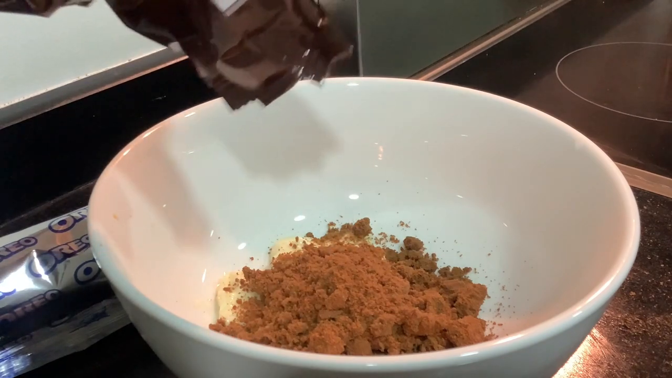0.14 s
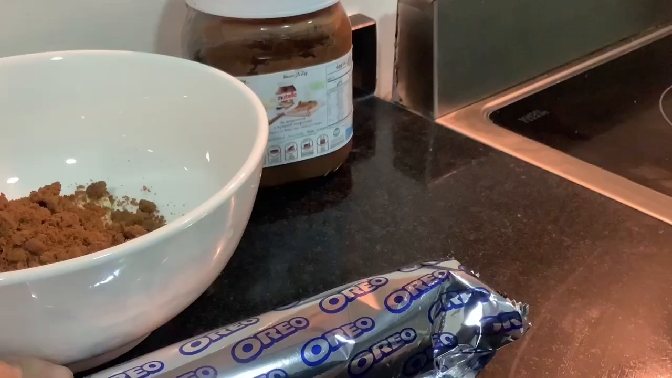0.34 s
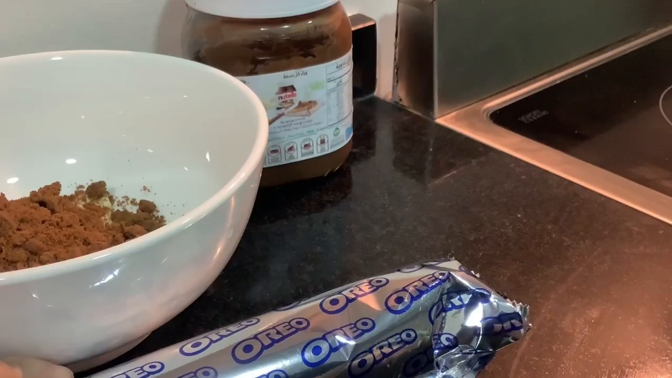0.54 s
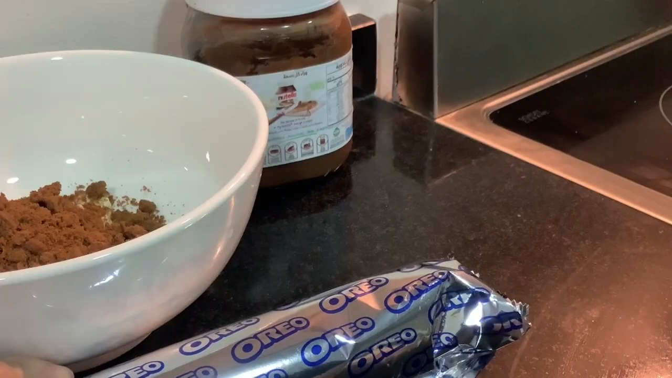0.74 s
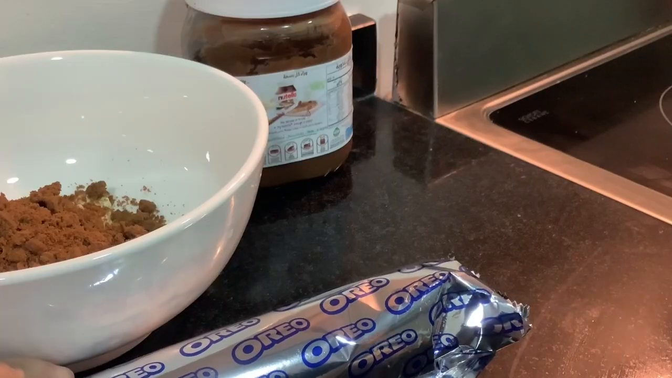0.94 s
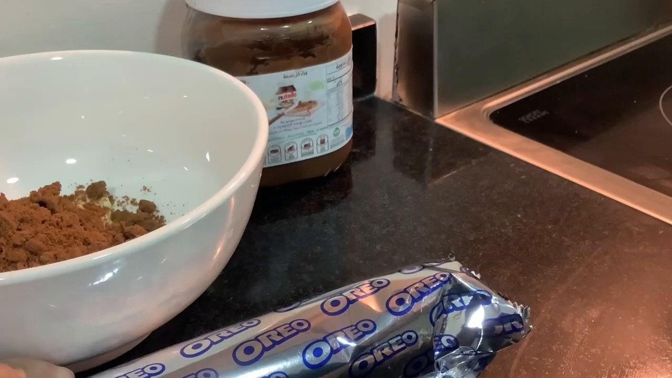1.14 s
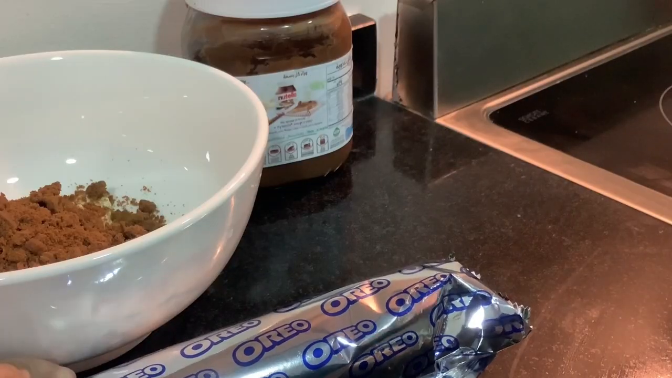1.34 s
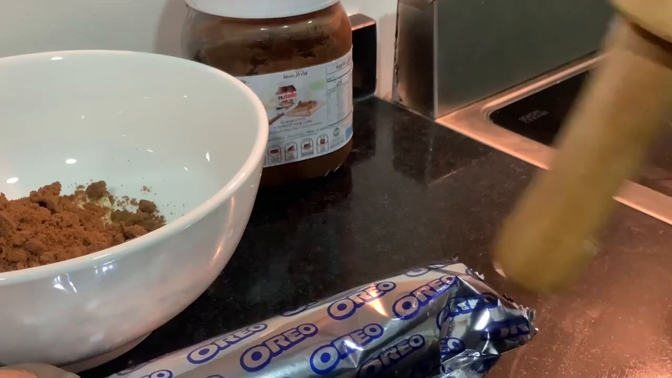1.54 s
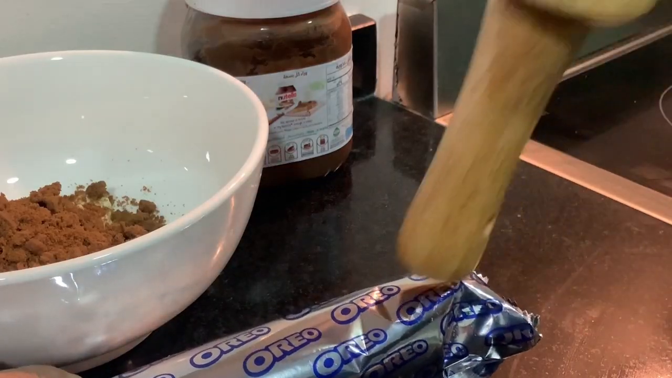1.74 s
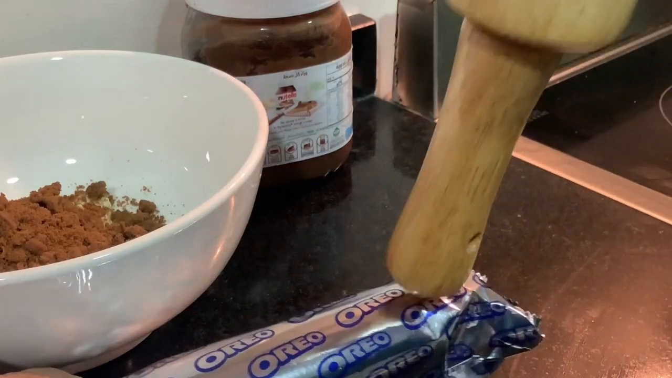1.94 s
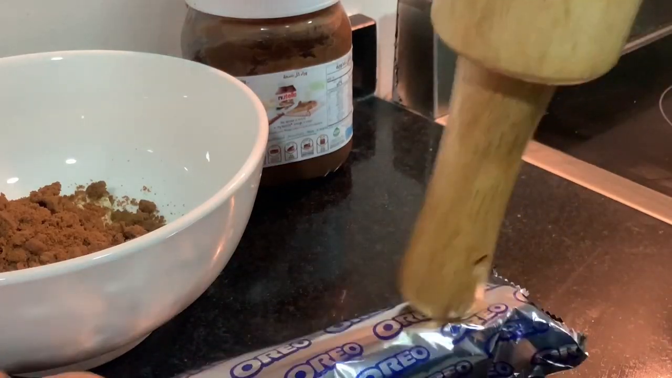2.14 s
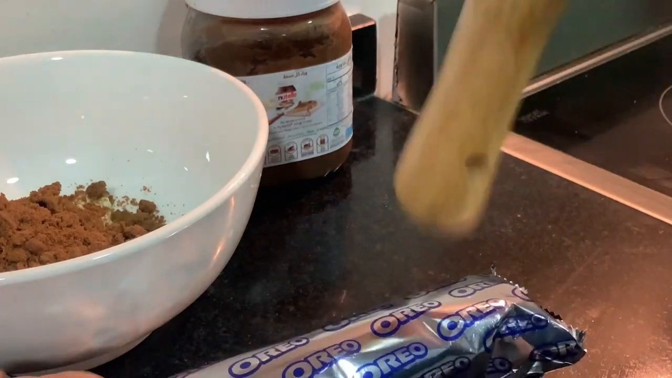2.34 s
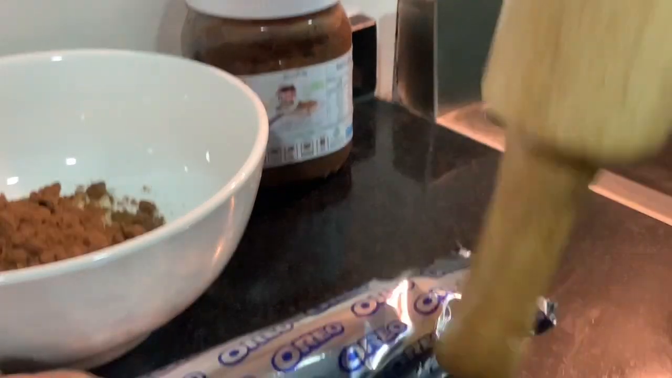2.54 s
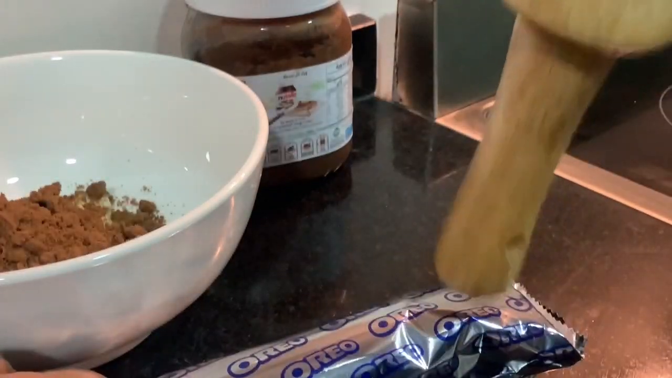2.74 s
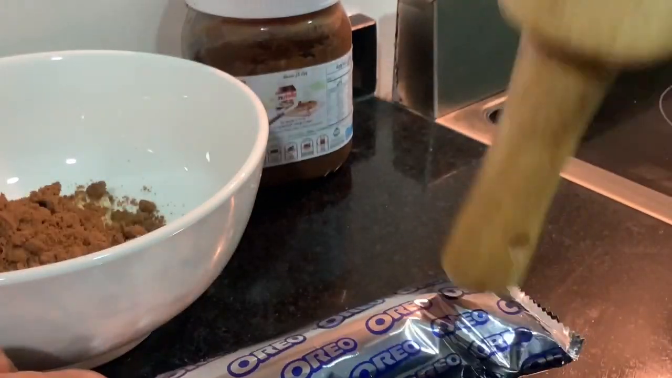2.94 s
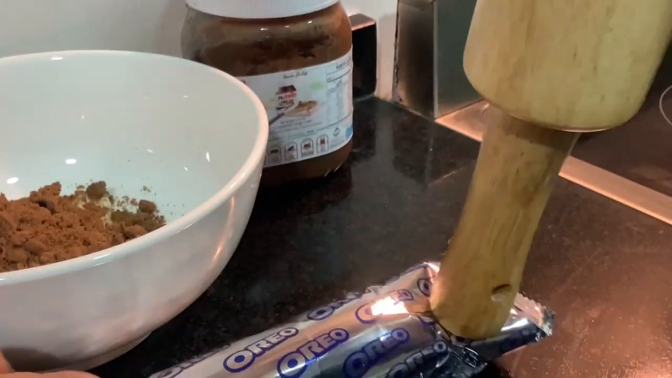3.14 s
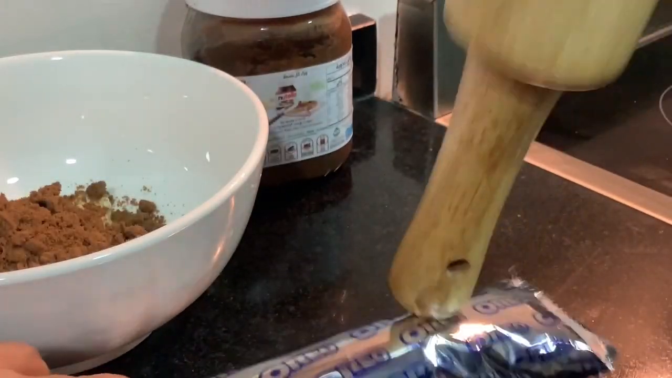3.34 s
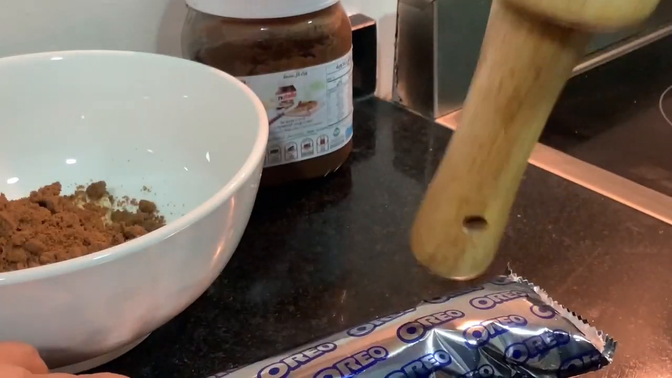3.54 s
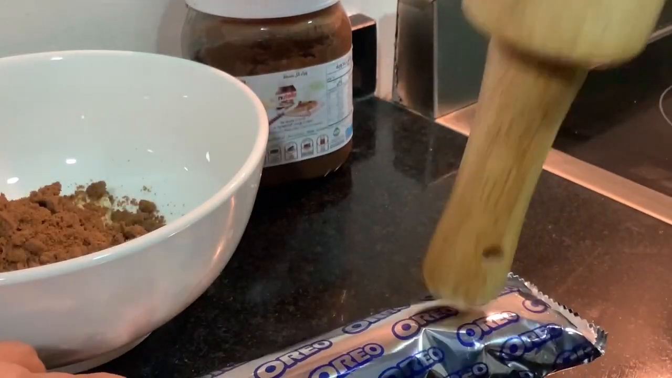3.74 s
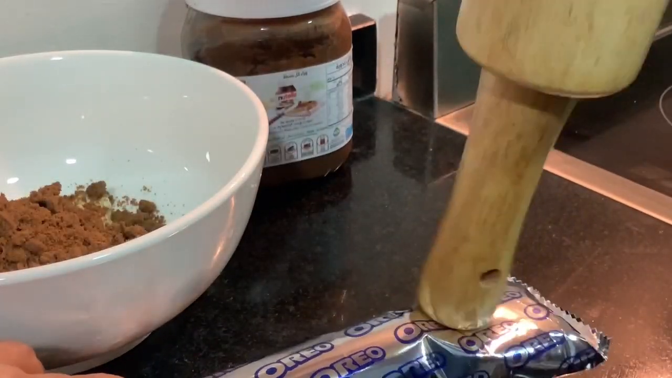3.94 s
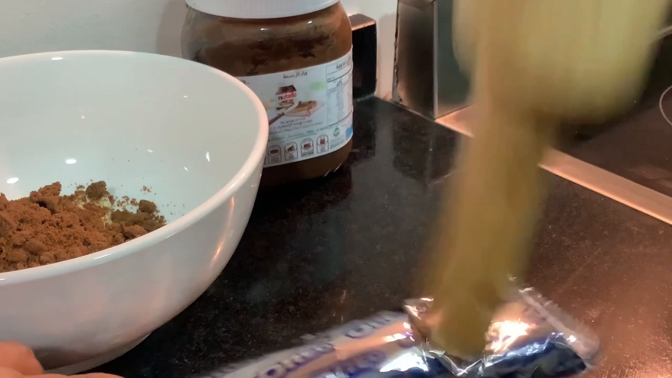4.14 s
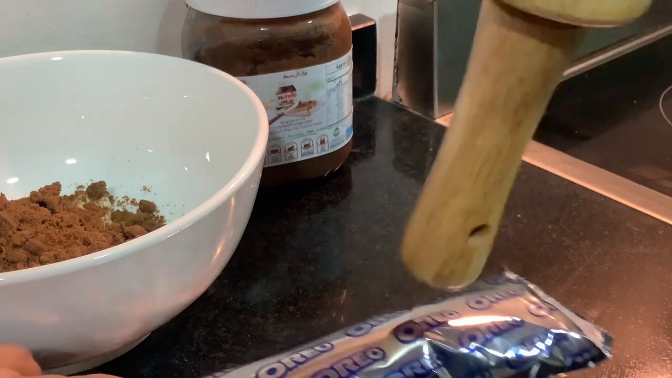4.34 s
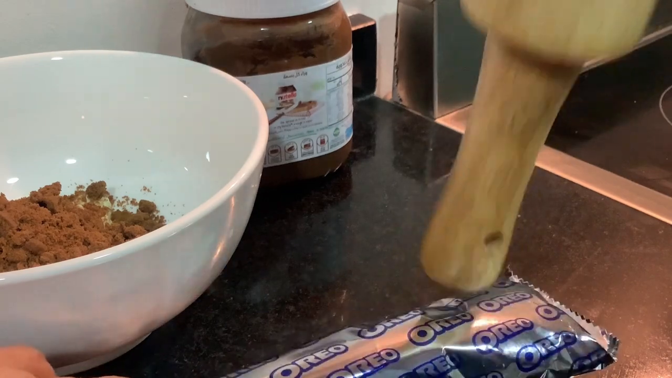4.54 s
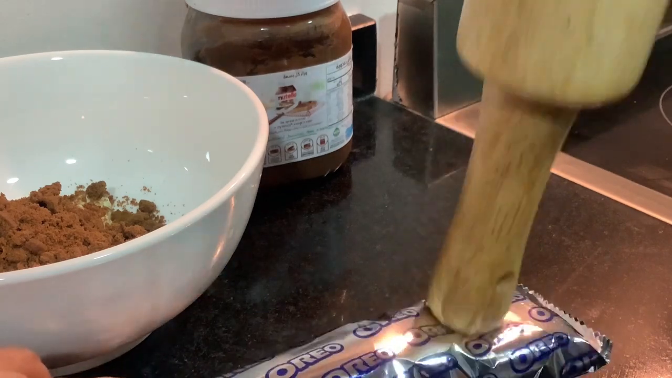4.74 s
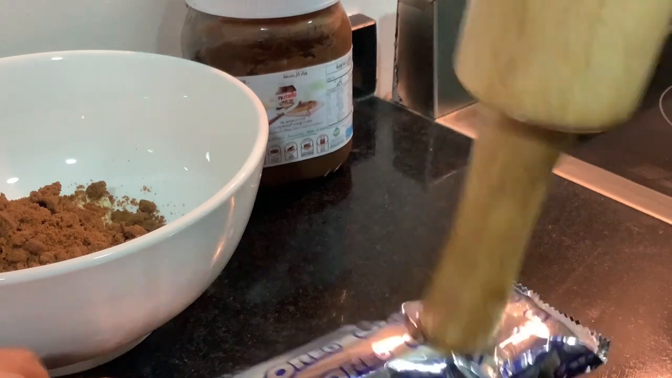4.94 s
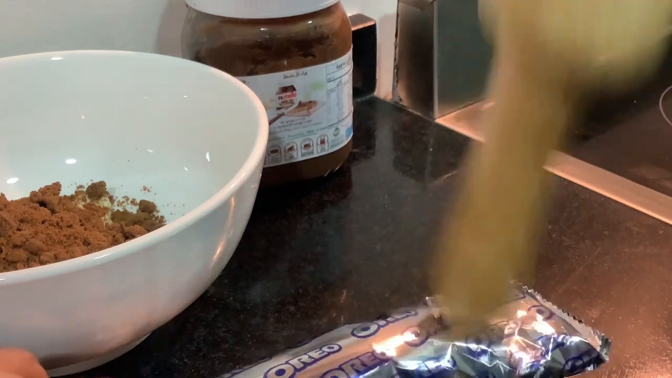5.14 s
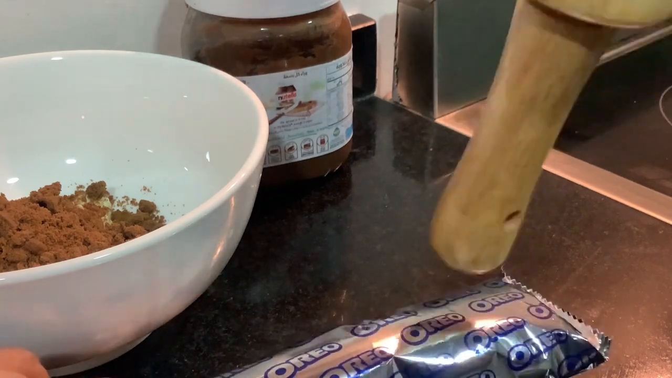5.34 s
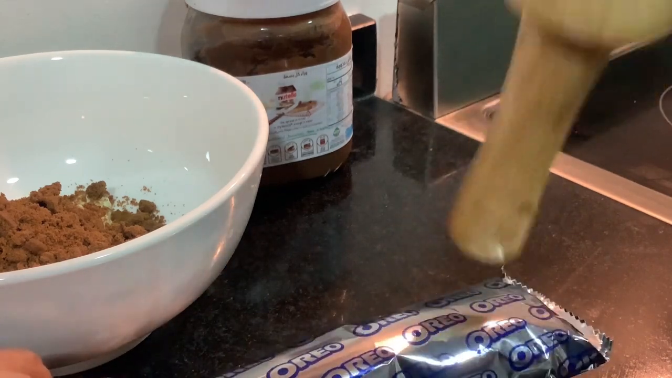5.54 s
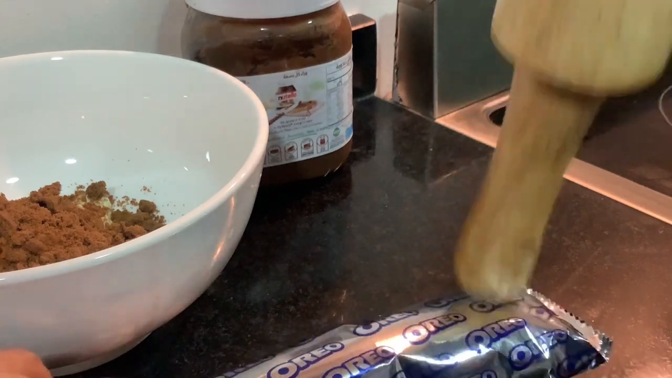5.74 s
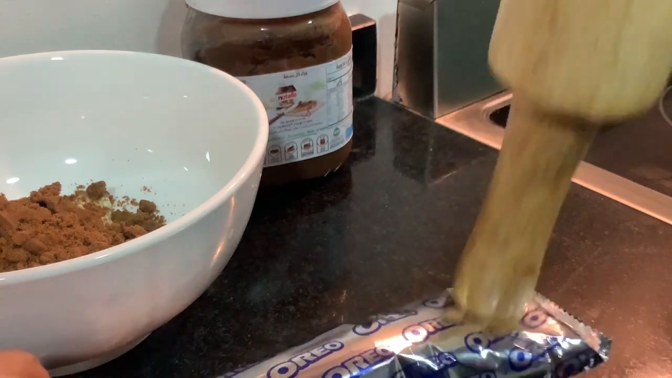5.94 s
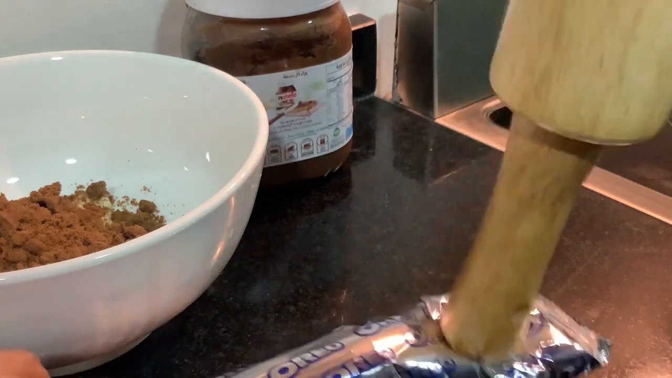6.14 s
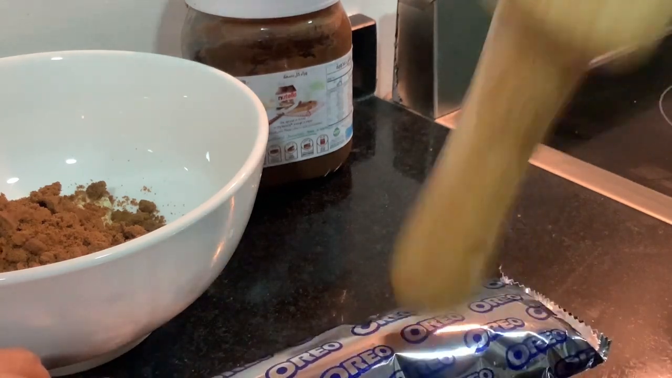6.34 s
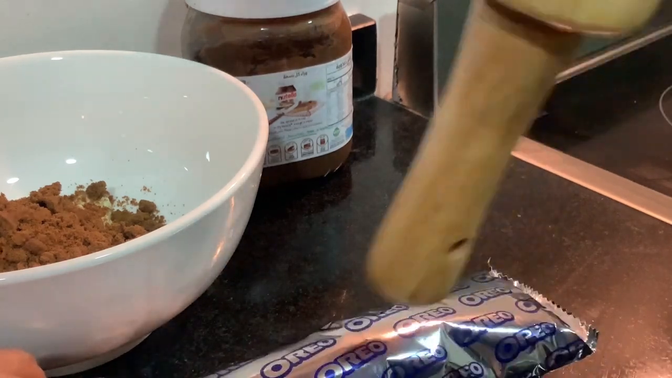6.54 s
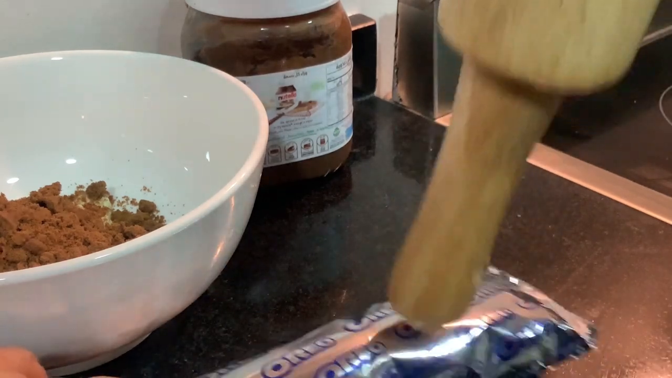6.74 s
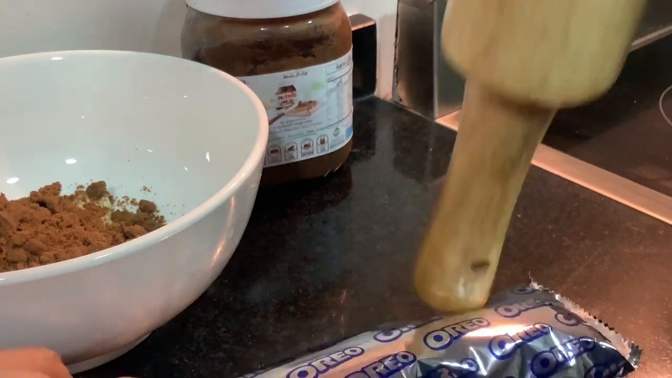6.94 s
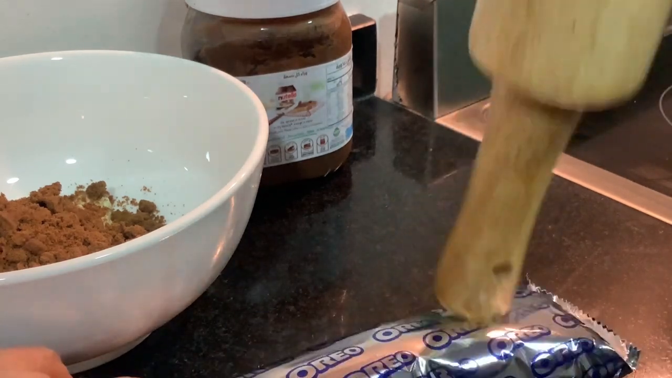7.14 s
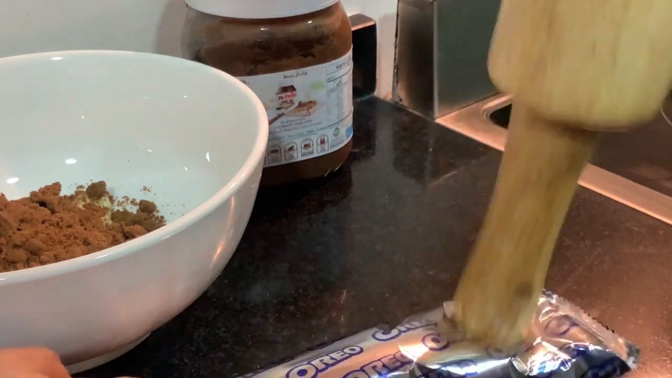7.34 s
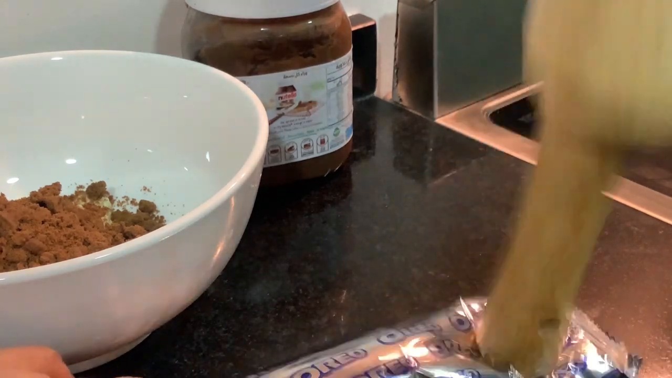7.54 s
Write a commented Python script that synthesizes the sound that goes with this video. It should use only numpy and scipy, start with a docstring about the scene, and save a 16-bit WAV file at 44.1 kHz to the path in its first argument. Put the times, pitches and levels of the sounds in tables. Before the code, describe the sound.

A wooden rolling pin pounds foil-wrapped biscuits on a stone worktop in fast even blows, each a gritty crunch with crinkling foil and a low thud.

```python
"""In a kitchen, the handle of a wooden rolling pin pounds biscuits in their foil wrapper on a stone worktop.
Each blow, close to the microphone, is a burst of tiny breaks, with damped tones for the clack of the pin,
the knock of the worktop and the thud of the cupboard below. The wrapper crinkles in clumps of crackle and snaps
in short bursts of noise. Outside, a songbird whistles in gliding tones; shaped noise gives a low kitchen rumble.
Kitchen and street each add an echo."""
import sys
import numpy as np
from scipy import signal
from scipy.fft import rfft, irfft, next_fast_len
from scipy.io import wavfile
from scipy.ndimage import map_coordinates

SR = 44100
rng = np.random.default_rng(int(sys.argv[2]) if len(sys.argv) > 2 else 0)


def generate_wav(signal):
    """Clip the signal to [-1, 1] and save it as 16-bit WAV at the path in sys.argv[1]."""
    frames = np.transpose(np.atleast_2d(signal))
    scaled = np.clip(frames, -1, 1) * 32767
    pcm = np.round(scaled).astype(np.int16)
    wavfile.write(sys.argv[1], SR, pcm)


def gain_from_db(level_db):
    """Turn a decibel level (scalar or array-like) into a linear amplitude factor."""
    decades = np.asarray(level_db, float) / 20
    return 10 ** decades


N = 334264  # length in samples

# Levels in these tables are relative: most sources also have a fixed trim of their own.
# Kitchen rumble over time. Each row: time in seconds, level in dB.
RUMBLE_LEVEL = [(0.0, -46), (0.67, -48.5), (0.93, -47), (1.58, -48), (2.68, -50), (2.81, -47),
                (4.28, -47.5), (4.98, -48.5), (5.95, -45), (7.22, -50), (7.58, -48)]
# Tone of the rumble. Each row: frequency in Hz, level in dB.
RUMBLE_TONE = [(15, -89), (25, -24), (68, -0.5), (114, 1.5), (277, -10.5), (344, -17.5), (545, -14),
               (734, -23.5), (2550, -37.5), (4140, -44), (5570, -45), (7500, -46.5), (16000, -49)]
# Whistles of the bird. Each row: start in seconds, length in seconds, first pitch in Hz,
# pitch it glides towards in Hz, peak level in dB.
WHISTLES = [(.03, .03, 1700, 1730, -63), (0.241, .2, 5640, 4820, -59.5), (0.442, .12, 5940, 6400, -64),
            (5.001, 0.074, 2490, 2450, -42.5), (5.3, 0.072, 2430, 2500, -62),
            (6.041, 0.095, 2020, 1824, -44), (6.258, 0.036, 2470, 2440, -44),
            (6.339, 0.083, 2640, 2530, -46.5), (6.565, 0.085, 2130, 2080, -48),
            (6.76, .07, 2500, 2480, -49), (7.27, 0.03, 1670, 1620, -49)]
# Chirps that climb and break off downwards. Each row: start in seconds, length in seconds, level in dB.
CHIRPS = [(0.616, 0.024, -57.5), (0.695, 0.026, -56), (0.737, 0.017, -59), (.792, .018, -55.5),
          (0.832, .014, -58)]
# Shape of every chirp. Each row: share of its length from 0 to 1, pitch in Hz, level in dB.
CHIRP_SHAPE = [(0, 3450, -5), (.45, 3970, -10), (.8, 4130, -2), (1, 3300, -1)]
# The bird's opening phrase. Each row: time in seconds, pitch in Hz, level in dB.
PHRASE = [(.075, 1940, -59), (.1, 2300, -58), (.125, 2604, -48), (.14, 2520, -51), (.148, 2830, -48),
          (.156, 2760, -56), (.165, 2000, -57), (.172, 1900, -70)]
# Strength of the bird's octave. Each row: pitch of the note in Hz, octave against the note in dB.
OCTAVE = [(4200, -40), (4900, -15), (5500, -19), (6000, -40)]
# Echo of the street around the bird. Each row: frequency in Hz, time to die by 60 dB in seconds.
STREET = [(2000, 0.68), (6000, 0.35)]
# Echo of the kitchen. Each row: frequency in Hz, time to die by 60 dB in seconds.
KITCHEN = [(100, 0.58), (500, 0.48), (2500, 0.54), (8000, 0.47), (15000, 0.13)]
# Single creases of the foil snapping. Each row: time in seconds, level in dB, pitch in Hz,
# low tick against the click in dB.
SNAPS = [(0.036, -36, 12500, -30), (0.0627, -33, 7800, -5), (0.097, -32.5, 5400, -21),
         (0.1794, -42, 5560, -15), (0.218, -50, 8000, -20), (0.2444, -49, 8000, -15),
         (0.3444, -51, 4940, -7), (0.7468, -54, 3900, 18), (0.829, -42, 11500, -30), (1.052, -48, 3570, 13),
         (1.0837, -42, 4380, -12), (1.1937, -20, 6360, -3), (1.2479, -50, 3860, 16.5),
         (1.3393, -30.5, 4170, 6.5), (1.356, -30, 4500, -6), (1.4039, -31, 3200, 1),
         (1.409, -18, 9150, -28), (1.4506, -24, 8300, -20), (1.4632, -21, 9350, -29),
         (1.5084, -32, 9990, -15), (1.569, -34, 10300, -3.5), (1.578, -33, 10000, -27),
         (1.658, -43, 3420, -3), (1.6796, -50, 3800, -9), (1.73, -38, 7260, -21), (1.7497, -39, 11200, -8),
         (1.8185, -8, 5490, -1), (1.924, -11, 11300, -8), (1.9644, -29, 10200, -20),
         (2.003, -21.5, 10700, -31), (2.2033, -22, 3730, 3), (2.367, -34.5, 4670, 2),
         (2.4518, 5, 7400, -11), (2.466, -9, 4200, 10), (2.537, -27, 3210, 6), (2.5604, -10, 10100, -18),
         (2.5657, -8, 5570, -8), (2.614, -14.5, 5900, -15), (2.653, -22, 3220, 2), (2.672, -25, 3200, 1),
         (2.8091, -4, 3780, -0.5), (2.834, -16, 11150, -16), (2.9043, -15, 3160, 2),
         (2.9503, -15.5, 4650, -2), (3.0972, -6, 4050, -1), (3.2333, -17.5, 5360, 5.5),
         (3.265, -16, 3330, -9), (3.2785, -13.5, 8540, -9), (3.3982, -33, 6990, -9),
         (3.4497, -15.5, 4540, -6), (3.481, -22.5, 4700, 1.5), (3.5564, -36, 9040, -11),
         (3.5873, -38.5, 3400, 12.5), (3.6064, -46, 3490, 10), (3.73, -17, 5280, -13),
         (3.7494, -20.5, 4150, 3), (3.77, -18, 3800, 1), (3.843, -19, 10300, -3.5),
         (3.8683, -17.5, 5800, -13), (3.978, -17, 5920, -14), (4.2552, -14, 4510, 1.5),
         (4.3125, -21.5, 3620, -1), (4.359, -25.5, 5350, 0), (4.5113, -24.5, 4830, 7.5),
         (4.526, -23, 6000, -8), (4.546, -26.5, 5000, 6.5), (4.778, -16.5, 4700, -0.5),
         (4.834, -6.5, 11300, -38), (4.898, -20, 3520, -17), (4.9594, -1.5, 9700, -13),
         (4.9773, -9, 5760, -5), (5.0116, -36, 3450, -4), (5.22, -12.5, 3530, -12), (5.2416, -25, 4290, 1),
         (5.264, -13, 5380, -3.5), (5.476, -10.5, 4060, -7), (5.4946, -11, 5400, -13),
         (5.5104, -34, 3710, 4), (5.6933, -9, 5530, -24), (5.7093, -24, 4330, 1), (5.726, -4, 7640, -11),
         (5.7379, -10.5, 5400, -3), (5.7595, -12.5, 4000, -2), (5.8473, -44.5, 3300, 13),
         (5.954, -11, 5870, -15), (5.9852, -11, 5400, -0.5), (6.101, -46.5, 3230, 11),
         (6.1936, -9.5, 5510, -2.5), (6.2344, -13.5, 5870, 2), (6.2444, -19, 3430, 8),
         (6.2948, -33, 3500, 7), (6.4444, -9, 5460, -1.5), (6.4762, -16, 3220, 1),
         (6.5148, -20.5, 3610, -2), (6.584, -22, 5900, -23), (6.6448, -7.5, 5300, 0),
         (6.7254, -16, 4720, 2.5), (6.839, -21, 3780, -14), (6.959, -27, 4760, -7), (6.9709, -14, 3530, -5),
         (7.025, -29, 4720, -1), (7.1076, -11.5, 5300, 6.5), (7.1521, -14.5, 5200, -4),
         (7.1647, -20, 5600, 8.5), (7.3843, -8.5, 3300, -1.5)]
# The pin leans on the packet after a blow, then lifts. Each row: start in seconds, foil level in dB,
# sag in dB per second, time held in seconds, crumbs against the foil in dB.
PRESSES = [(1.818, -22.5, 200, 0.028, -2.5), (2.104, -22, 161, 0.13, 3), (2.412, -13, -24, .047, -5),
           (2.468, -21.5, 34, 0.0553, 6), (2.797, -15.5, 114, .12, -6), (3.09, -15.5, 228, 0.22, 2),
           (3.358, -22, 334, .095, 6.5), (3.645, -18.5, 198, 0.3, 1.5), (3.906, -19.5, 161, 0.1, 2.5),
           (4.16, -16.5, 143, 0.15, -1), (4.412, -23, 137, 0.13, 3), (4.684, -16.5, 205, 0.16, 4.5),
           (4.935, -21, 124, 0.077, -3), (5.18, -27.5, 30, 0.092, 0), (5.426, -27, 21, 0.085, 1),
           (5.668, -22.5, 45, 0.091, -8), (5.905, -23.5, 17, 0.096, -4.5), (6.148, -26, 3, 0.088, -5),
           (6.386, -18, 101, 0.106, -5), (6.622, -16.5, 231, 0.13, 2), (6.856, -19.5, 174, .12, 5),
           (7.093, -25, 52, 0.093, -0.5), (7.33, -26, 35, 0.082, -1.5), (7.558, -20.5, 56, 0.069, 2)]
# The hand shifts the packet or the foil creeps back. Each row: start in seconds, foil level in dB,
# sag in dB per second, time held in seconds, crumbs against the foil in dB.
RUSTLES = [(0, -55.5, 16, .05, -5), (.06, -50.5, -58, 0.041, -14), (.12, -63, 52, .2, -6),
           (1.045, -60.5, 62, .13, 4), (1.191, -58.5, 300, 0.015, 3), (1.21, -61.5, -23, 0.26, -1),
           (1.329, -54, 60, 0.093, 5), (1.402, -42.5, 600, .012, 9), (1.445, -49.5, 40, 0.15, -2.5),
           (1.61, -62, 20, .17, 2), (1.84, -44, 142, 0.092, 4), (1.79, -27, -100, 0.025, -1),
           (1.93, -44.5, -29, .15, -6.5), (2.385, -47.5, -200, 0.041, 4), (2.533, -21, 144, 0.192, 5.5),
           (3.225, -26, 155, 0.12, -8), (3.83, -48, 2, 0.064, -8.5), (4.135, -45, -200, 0.028, 9),
           (4.351, -32.5, 247, 0.056, -13), (4.87, -47, 10, 0.09, -6), (6.779, -45, 10, 0.08, -5)]
# Tone of the crinkling foil. Each row: frequency in Hz, level in dB.
FOIL_TONE = [(880, -15), (1500, -22), (1670, -3), (3540, -4.5), (5320, -3), (6410, -8.5), (7560, -6.5),
             (13600, -6), (15400, -12.5)]
# Tone of the grinding crumbs. Each row: frequency in Hz, level in dB.
CRUMBS_TONE = [(88, -33.5), (150, -7.5), (264, -7.5), (314, -10.5), (552, -3.5), (675, -6.5), (935, -2.5),
               (1310, -15), (1560, -11), (3000, -16.5), (3900, -30), (6600, -120)]
# Ringing of the worktop, the pin and the bowl that stands near. Each row: pitch in Hz, level in dB,
# time to die by 60 dB in seconds.
WORKTOP = [(219.8, 0.5, 0.073), (251.7, 1, 0.074), (334.4, -0.5, 0.11), (388.8, 2.5, 0.079),
           (431, 0.5, 0.047), (577.8, -8.5, 0.16), (681, 3, 0.028), (848, -7, 0.047), (1072, -17, 0.2),
           (1630, -27, 0.093), (1747, 7, 0.028), (2350, -41, 0.047), (2640, -21.5, 0.49)]
# Ringing of the cupboard under the worktop. Each row: pitch in Hz, level in dB,
# time to die by 60 dB in seconds.
CUPBOARD = [(66, -9, 0.11), (80, 7.5, 0.16), (112, 7, 0.35), (126, -3, 0.32)]
# Light taps on the worktop, ahead of the first blow and along with it. Each row: time in seconds,
# level in dB, favoured pitch in Hz.
TAPS = [(1.406, -26, 620), (1.459, -40, 580), (1.788, -32, 600)]
# Knocks on the worktop, through the crumbs or, near 2.5 s, from the pin slipping off. Each row:
# time in seconds, knock level in dB, favoured knock pitch in Hz, thud level in dB, favoured thud pitch in Hz.
KNOCKS = [(1.803, -33, 198, -29, 93), (2.1181, -16.5, 357, -21, 112), (2.4124, -19.5, 203, -23.5, 103),
          (2.484, -7, 438, -18.5, 110), (2.5027, -24, 447, -23, 119), (2.8135, -42, 383, -36, 102),
          (3.099, -25, 385, -28.5, 98.5), (3.3689, -22, 355, -25.5, 92), (3.6452, -10, 254, -27, 116),
          (3.906, -16.5, 215, -29, 118), (4.165, -23.5, 277, -24.5, 92), (4.412, -19.5, 250, -26.5, 116),
          (4.6866, -17, 410, -23.5, 80), (4.9473, -25, 350, -24, 86), (5.1882, -26.5, 328, -22.5, 84),
          (5.4234, -12.5, 347, -22.5, 86), (5.6767, -22.5, 335, -19.5, 86), (5.925, -23, 365, -16.5, 94),
          (6.1428, -23, 380, -23, 79.7), (6.381, -17, 243, -23.5, 97.5), (6.6219, -11, 354, -28.5, 90),
          (6.8767, -18, 356, -30.5, 101), (7.098, -22.5, 318, -32.5, 113), (7.345, -20.5, 370, -21.5, 91),
          (7.5639, -19, 415, -25, 94)]
# Blows as the pin meets the packet. Each row: time in seconds, crunch level in dB,
# clack against the crunch in dB, fall of the crunch in seconds, lead of the crunch before the time in seconds.
BLOWS = [(1.786, -18, -4, 0.026, 0.0039), (2.0978, -1, -25, 0.017, 0.0012),
         (2.4086, -2.5, -17, 0.011, 0.0025), (2.466, -4, 0, 0.006, 0.0076),
         (2.7873, -10.5, -1.5, 0.035, 0.0081), (3.083, -4.5, -23, 0.0082, 0.0023),
         (3.3478, -7.5, -0.5, 0.018, 0.0016), (3.6394, 0, -13, 0.014, 0.0026),
         (3.9024, 2, -17, 0.0097, 0.0018), (4.1567, 0.5, -14, 0.013, 0.0015),
         (4.4072, -1.5, -7, 0.02, 0.0026), (4.679, 1.5, -22, 0.013, 0.0017),
         (4.9257, 1, -11.5, 0.015, 0.0044), (5.1712, 3.5, -11.5, 0.015, 0.0046),
         (5.418, 5.5, -10.5, 0.022, 0.0096), (5.658, 0.5, -10, 0.02, 0.0063),
         (5.898, -1.5, -31, 0.017, 0.0041), (6.1351, 0, -6, 0.02, 0.0057), (6.3792, -4, -15, 0.024, 0.0019),
         (6.6177, 3, -9.5, 0.008, 0.0017), (6.8504, -4, -7, 0.029, 0.002),
         (7.0868, -6.5, -4.5, 0.033, 0.0057), (7.3233, 1.5, -19, 0.02, 0.0059),
         (7.5503, -2, -15, 0.017, 0.0071)]
# Tone of the crunch. Each row: frequency in Hz, level in dB.
CRUNCH_TONE = [(290, -44), (500, -13), (688, 3), (1300, 0.5), (1790, 3), (3440, -4.5), (5390, -4.5),
               (6420, -9), (8830, -7.5), (16000, -11)]
# Response of the microphone. Each row: frequency in Hz, level in dB.
MIC = [(20, -12), (45, -2), (80, 0), (15700, 0), (16300, -25), (16900, -60), (22050, -80)]


def unit(x):
    """Scales a sound to rms 1."""
    return x / np.sqrt(np.mean(x ** 2) + 1e-20)


def along(points, hz):
    """Reads (Hz, value) points on a log frequency axis."""
    f, v = np.transpose(points)
    return np.interp(np.log(hz + 1), np.log(f + 1), v)


def wobble(rate):
    """A smooth random curve with rate knots a second."""
    return map_coordinates(rng.standard_normal(3000), [np.arange(N) * rate / SR])


def coloured(x, tone):
    """Filters x to a (Hz, dB) shape without any sound ahead of its cause."""
    m = 2 * next_fast_len(N // 2 + 4096)
    gain = gain_from_db(along(tone, np.fft.rfftfreq(m, 1 / SR)))
    cepstrum = irfft(np.log(gain + 1e-6), m)
    # folding the second half onto the first makes the filter minimum phase
    cepstrum[1:m // 2] *= 2
    cepstrum[m // 2 + 1:] = 0
    return irfft(rfft(x, m) * np.exp(rfft(cepstrum)), m)[:N]


def crackle(per_s, spread_db, hiss, lo_hz, hi_hz, cycles):
    """Tiny breaks, each a few cycles at its own pitch, some much larger, over breaks too dense to tell apart."""
    when, size, pitch, phase = rng.random((30000, 4))[:int(per_s * N / SR)].T
    hz = (lo_hz + pitch * (hi_hz - lo_hz))[:, None]
    t = np.arange(int(3 * cycles / lo_hz * SR) // 2 + 24) / SR
    gain = gain_from_db(-spread_db * np.log(size + 0.01))[:, None] * np.sqrt(hz)
    grains = gain * np.exp(-t * hz / cycles) * np.cos(2 * np.pi * (hz * t + phase[:, None]))
    at = (when * N).astype(int)[:, None] + np.arange(len(t))
    breaks = np.bincount(at.ravel(), grains.ravel(), N)[:N]
    return unit(breaks) + hiss * rng.standard_normal(N)


def ring(modes, t, attack, scatter_db, centre_hz=0, focus_db=0):
    """Damped tones at new strengths each time; the spot that is hit may favour those near one pitch."""
    total = 0
    for hz, db, t60 in modes:
        db = db + scatter_db * rng.standard_normal()
        db = db - focus_db * np.log(hz / (centre_hz or hz)) ** 2
        pitch = hz * rng.normal(1, 0.013)
        total = total + gain_from_db(db - 60 * t / t60) * np.sin(2 * np.pi * pitch * t)
    return total * (1 - np.exp(-t / attack))


def add(track, s, sound):
    """Mixes a sound into the track at s seconds."""
    part = track[max(round(s * SR), 0):][:len(sound)]
    part += sound[:len(part)]


def rumble():
    """Low noise of the house with a faint hiss, its level drifting a little."""
    level_db = np.interp(np.arange(N) / SR, *np.transpose(RUMBLE_LEVEL))
    return gain_from_db(level_db + 1.0) * unit(coloured(rng.standard_normal(N), RUMBLE_TONE))


def bird():
    """Gliding, fluttering whistles and short chirps; the middle notes carry a faint octave."""
    out, notes = np.zeros(N), []
    for s, length, first_hz, last_hz, db in WHISTLES:
        share = np.arange(0, 1, 1 / (length * SR))
        glide = np.exp(-0.9 * last_hz / 1000 * share)  # high notes slur fast
        pitch = last_hz + (first_hz - last_hz) * glide
        notes.append((s, pitch, db + np.interp(share, [0, 0.4, 1], [-12.5, 0, -12.5])))
    points, chirp_hz, chirp_db = np.transpose(CHIRP_SHAPE)
    for s, length, db in CHIRPS:
        share = np.arange(0, 1, 1 / (length * SR))
        notes.append((s, np.interp(share, points, chirp_hz), db + np.interp(share, points, chirp_db)))
    s, hz, db = np.transpose(PHRASE)
    t = np.arange(s[0], s[-1], 1 / SR)
    notes.append((s[0], np.interp(t, s, hz), np.interp(t, s, db)))

    waver = 1 + 0.009 * wobble(140)  # unsteady pitch
    for s, pitch, db in notes:
        t = np.arange(len(db)) / SR
        phase = 2 * np.pi * np.cumsum(pitch * waver[round(s * SR):][:len(t)]) / SR
        edge = np.clip(np.minimum(t, t[-1] - t) / 0.0016, 0, 1)  # soft ends
        octave = gain_from_db(along(OCTAVE, pitch)) * np.sin(2 * phase)
        add(out, s, gain_from_db(db + 4.0) * edge * (np.sin(phase) + octave))
    flutter = unit(gain_from_db(2.2 * wobble(110)))
    return out * flutter


def snaps():
    """A snap is a sharp click with a short ring, the shorter the higher its pitch, and a duller tick of the packet."""
    out, t = np.zeros(N), np.arange(SR // 30) / SR
    low = signal.butter(2, [500, 2200], "band", fs=SR)
    for s, db, hz, low_db in SNAPS:
        a, b, c = rng.standard_normal((3, len(t)))
        band = signal.butter(2, [hz / 1.67, min(hz * 1.17, 20000)], "band", fs=SR)
        high = signal.butter(2, min(hz / 0.78, 20000), "high", fs=SR)
        click = unit(signal.lfilter(*band, a)) + 1.07 * unit(signal.lfilter(*high, b))
        click = click * gain_from_db(-60 * t / (0.0043 + 30 / hz))
        tick = unit(signal.lfilter(*low, c)) * gain_from_db(low_db - 60 * t / 0.034)
        add(out, s - 0.0005, gain_from_db(db - 7.5) * (click + tick))
    return out


def load(rows, surge_db):
    """Foil and crumb power under a grip that sags or swells while held, drops at the lift and settles."""
    power, t = np.zeros((2, N)), np.arange(SR // 2) / SR
    for s, db, sag, held, crumbs_db in rows:
        free = np.maximum(t - held, 0)  # seconds since the lift
        spring = gain_from_db(-902 * free)
        settle = gain_from_db(-19 - 160 * free)
        creep = gain_from_db(-28 - 50 * free)  # the foil keeps creeping faintly
        fading = spring + (free > 0) * (settle + creep)
        surge = surge_db * np.exp(-t / 0.0061)  # the foil flattens first under a blow
        grip = np.minimum(t / 0.0013, 1) * gain_from_db(db - sag * np.minimum(t, held) + surge)
        fall_db = 8 * np.exp(-((t - held) / 0.018) ** 2)  # crumbs fall back as the load comes off
        linger_db = 30 * free  # crumbs die slower than foil
        foil = grip * fading
        add(power[0], s, foil ** 2)
        add(power[1], s, (foil * gain_from_db(crumbs_db + fall_db + linger_db)) ** 2)
    return power


def packet():
    """The foil crinkles and the broken biscuit grinds on the worktop while the pin presses and lifts."""
    foil_gain, crumbs_gain = np.sqrt(load(PRESSES, 10.5) + load(RUSTLES, 0) + 1e-12)
    # under load, breaks set each other off and leave gaps between bunches
    busy = np.clip((20 * np.log10(foil_gain) + 67.0) / 25, 0.2, 1)
    clumps = unit(gain_from_db(3.4 * busy * wobble(170)))
    crinkle = unit(coloured(clumps * crackle(1800, 4.1, 0.67, 2080, 15900, 0.7), FOIL_TONE))
    grind = coloured(clumps ** 0.53 * crackle(900, 3.3, 0.76, 396, 3160, 1.78), CRUMBS_TONE)
    # the grinding also sets the worktop ringing
    body = signal.fftconvolve(grind, ring(WORKTOP, np.arange(SR // 4) / SR, 0.00066, 0))[:N]
    crumbs = unit(grind) + 0.47 * unit(body)
    return gain_from_db(-4.5) * foil_gain * crinkle + gain_from_db(-5) * crumbs_gain * crumbs


def taps():
    """Light taps ring the worktop, quickly damped."""
    out, t = np.zeros(N), np.arange(SR // 2) / SR
    for s, db, hz in TAPS:
        add(out, s, gain_from_db(db) * ring(WORKTOP, t, 0.0011, 1.8, hz, 33) * gain_from_db(-60 * t / 0.05))
    return out


def knocks():
    """The worktop knocks; the cupboard booms once the weight of the pin has come down."""
    out, t = np.zeros(N), np.arange(SR // 2) / SR
    met = np.array(BLOWS)[:, 0]
    for s, db, knock_hz, thud_db, thud_hz in KNOCKS:
        add(out, s, gain_from_db(db) * ring(WORKTOP, t, 0.0025, 3.2, knock_hz, 41))
        nearest = met[np.argmin(abs(met - s))]
        down = max(nearest + 0.01874, s - 0.006)  # the thud lags behind the blow
        add(out, down, gain_from_db(thud_db - 4.5) * ring(CUPBOARD, t, 0.0032, 0.4, thud_hz, 74))
    return out


def blows():
    """Biscuit and foil crunch under the pin, which clacks in its upper tones."""
    burst, clack, t = np.zeros(N), np.zeros(N), np.arange(SR // 4) / SR
    for s, db, clack_db, fall, lead in BLOWS:
        swell = np.minimum(t / (2 * lead), 1) ** 2  # the foil gives way before the biscuit breaks
        add(burst, s - lead, gain_from_db(db - 10) * swell * np.exp(-(t / fall) ** 2.1))
        add(clack, s, gain_from_db(db + clack_db - 8.5) * ring(WORKTOP[5:], t, 0.0028, 2.7))
    crunch = unit(coloured(crackle(3500, 4.0, 0.54, 924, 16900, 0.45), CRUNCH_TONE))
    return burst * crunch + clack


def echo(x, walls):
    """Noise tails whose pitches die at their own speeds, drawn anew each quarter second."""
    out, step = np.zeros(N), SR // 4
    for start in range(0, N, step):
        hz, t, z = signal.stft(rng.standard_normal(SR // 2), SR, nperseg=256)
        fading = gain_from_db(-60 * t / along(walls, hz)[:, None])
        tail = signal.istft(z * fading, SR, nperseg=256)[1]
        answer = signal.fftconvolve(x[start:start + step], tail / np.linalg.norm(tail))
        add(out, start / SR + 0.0045, answer)
    return out


def scene():
    """Near pounding in the kitchen, far bird outside, each with its echo, over the rumble."""
    far = bird()
    near = snaps() + packet() + taps() + knocks() + blows()
    echoes = gain_from_db(-14.5) * echo(near, KITCHEN) + gain_from_db(-4) * echo(far, STREET)
    return (near + far + echoes + rumble())[None]


def band_limit(x):
    """A steep low-pass at the top of the band."""
    return signal.sosfilt(signal.butter(12, 16820, fs=SR, output="sos"), x)


def record(dry):
    """The microphone drops the deepest bass and the top; the loudest blows are softly squeezed."""
    mic = coloured(dry[0], MIC)
    squeezed = mic / (1 + np.abs(mic / 0.85) ** 4) ** (1 / 4)  # levels out towards 0.85
    finished = coloured(squeezed, MIC[2:])[None]  # the top is cut once more
    return band_limit(finished)


dry = scene()
out = record(dry)
generate_wav(out)
```